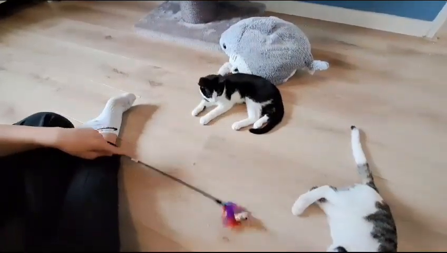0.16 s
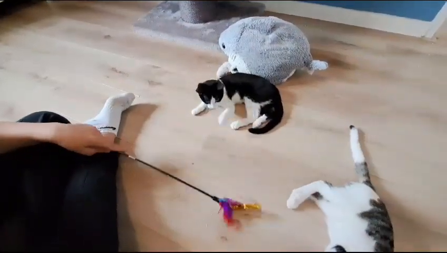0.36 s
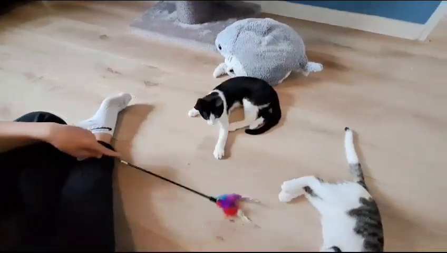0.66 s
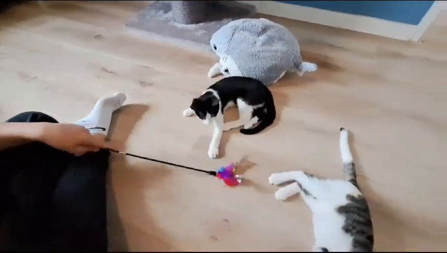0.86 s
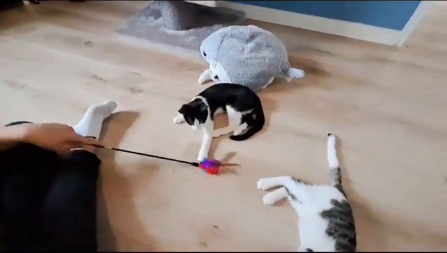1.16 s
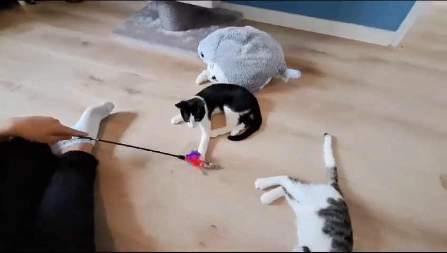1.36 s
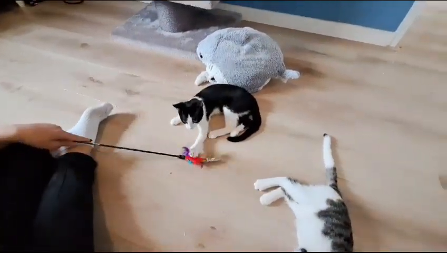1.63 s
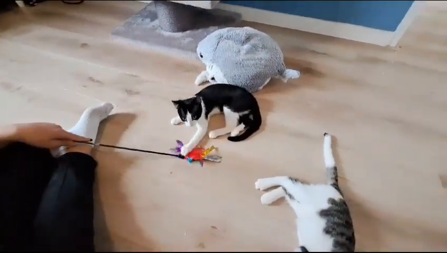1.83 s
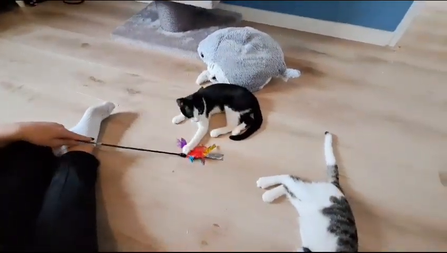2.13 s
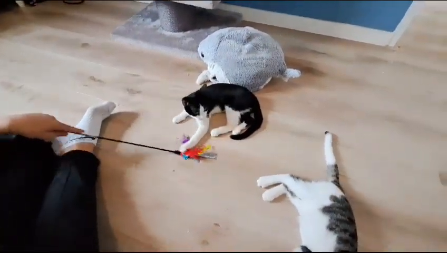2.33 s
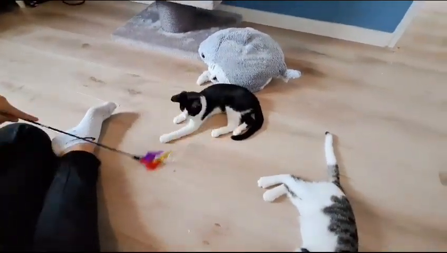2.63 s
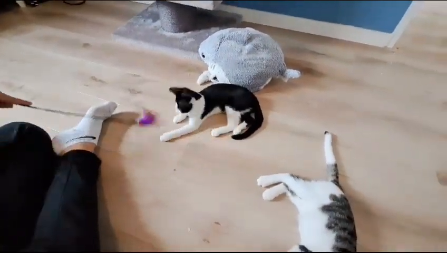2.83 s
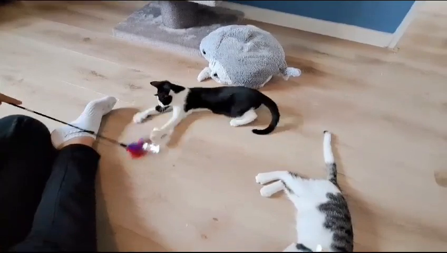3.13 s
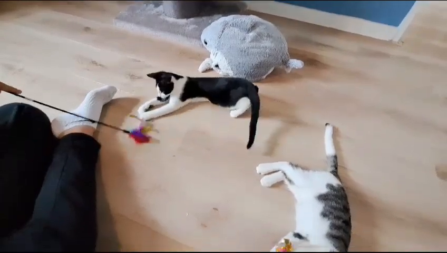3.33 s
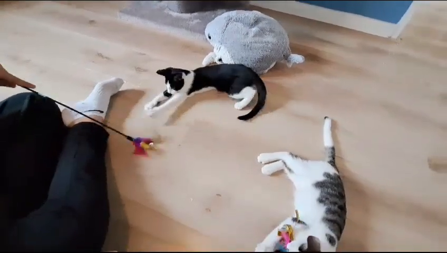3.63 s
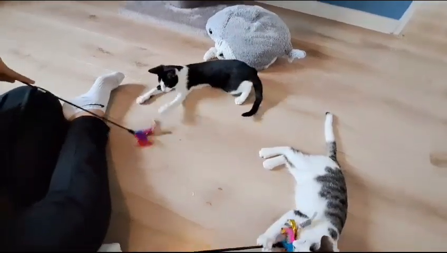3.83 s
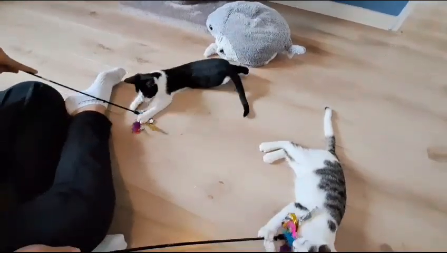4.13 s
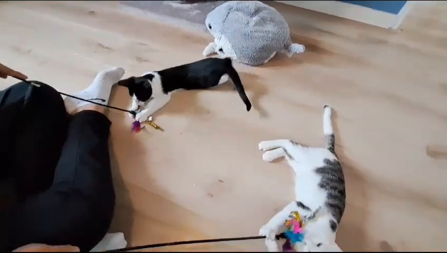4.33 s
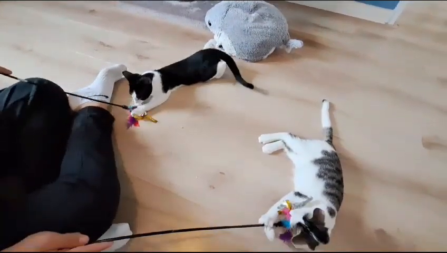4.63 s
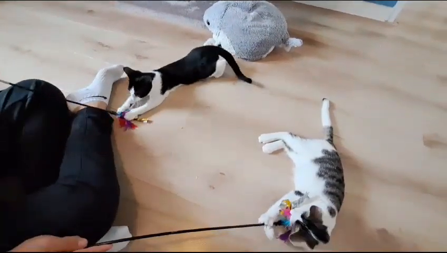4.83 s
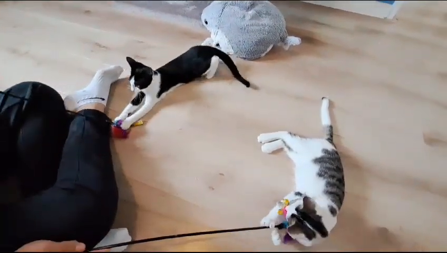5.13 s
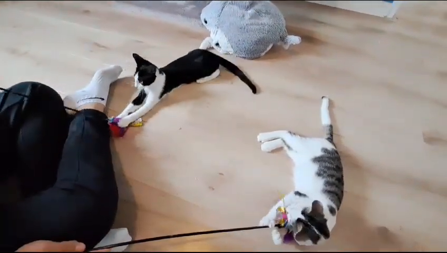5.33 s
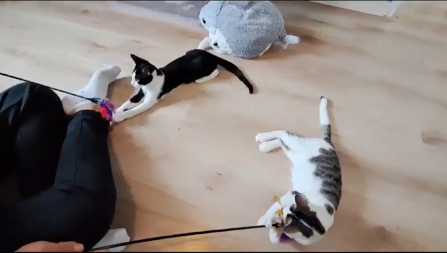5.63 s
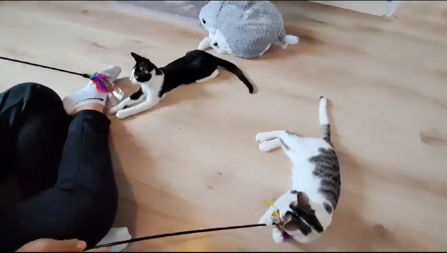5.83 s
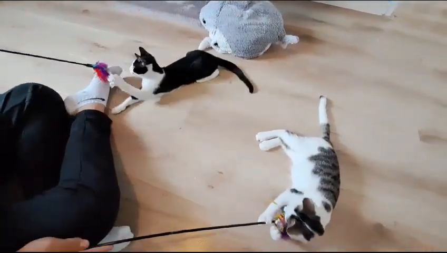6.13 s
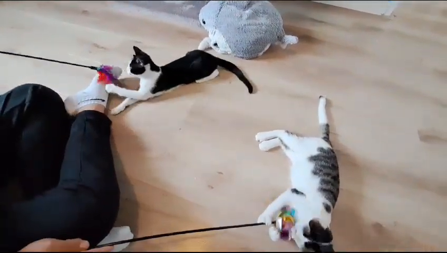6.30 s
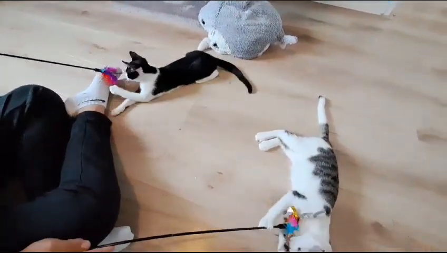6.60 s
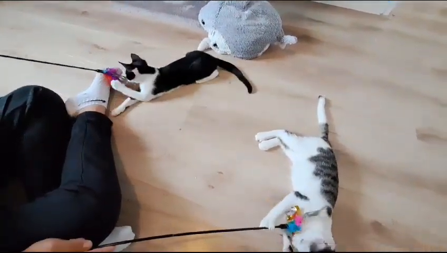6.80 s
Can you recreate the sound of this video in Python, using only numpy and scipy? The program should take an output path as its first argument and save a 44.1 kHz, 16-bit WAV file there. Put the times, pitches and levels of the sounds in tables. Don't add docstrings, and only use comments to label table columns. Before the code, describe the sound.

In a small indoor room, a phone close to a wooden floor picks up a foil and feather wand toy played with by kittens. From 0 to 0.5 s it swishes briskly, with dense bright crinkling, dry feather rub and hollow scrapes on the boards; light paw landings knock near 0.4 and 0.6 s. Crackling continues more loosely to 1.3 s, with another scrape around 1 s. From 1.5 to 2.5 s it is quiet, just faint rustle and isolated claw ticks. Foil snaps return from 2.7 s, busy through 3.9 s, with the sharpest click at about 4 s. Afterwards small crinkles and ticks are scattered, with a modest flurry around 5.6 to 5.9 s including a barely audible claw squeak, another rustle near 6.2 s, then near stillness. Low appliance hum, muffled body shifts and faint hiss run throughout.

```python
import sys
import numpy as np
from scipy import signal
from scipy.fft import rfft, irfft, next_fast_len
from scipy.io import wavfile
from scipy.ndimage import uniform_filter1d, map_coordinates

SR = 44100
rng = np.random.default_rng(int(sys.argv[2]) if len(sys.argv) > 2 else 0)


def log_audio(samples):
    frames = np.atleast_2d(samples).T
    limited = np.clip(frames, -1, 1)
    pcm = np.round(limited * 32767).astype(np.int16)
    wavfile.write(sys.argv[1], SR, pcm)


def undo_db(level):
    steps = np.asarray(level, float) / 20
    return 10 ** steps


N = 306936

# [t/s, hold/s, foil level/dB, drag level/dB]
TUGS = [(0.023, 0.023, -35, -44.5), (0.078, 0.0069, -45, -61), (0.156, .01, -62, -48),
        (0.227, 0.028, -38, -67), (0.267, 0.0058, -54, -45.5), (0.416, 0.046, -41.5, -54.5),
        (0.733, 0.011, -48.5, -57.5), (0.804, .01, -47.5, -52.5), (1.106, 0.08, -49, -55),
        (1.147, 0.015, -66, -51.5), (1.252, 0.011, -54, -60), (1.425, 0.13, -70, -61.5),
        (1.774, 0.034, -60, -62.5), (2.172, 0.1, -69, -74.5), (2.533, 0.0074, -63, -87),
        (2.717, 0.13, -57.5, -75), (2.915, 0.013, -49, -51), (3.095, 0.014, -61, -52.5),
        (3.264, 0.017, -51, -59), (3.444, 0.017, -45, -53.5), (3.69, 0.03, -44, -53),
        (3.76, 0.079, -45, -52.5), (3.89, 0.013, -57.5, -59.5), (3.92, 0.0098, -51, -53.5),
        (3.968, .01, -58, -77), (.12, .02, -58, -65), (5.965, .03, -60.5, -73), (6.03, 0.0091, -65, -74),
        (3.995, 0.016, -41, -48.5), (4.708, 0.037, -57, -58), (4.382, 0.12, -66, -69),
        (5.275, 0.024, -60.5, -63.5), (5.604, 0.039, -57, -69), (5.685, 0.022, -50, -62),
        (5.74, 0.029, -50.5, -53.5), (5.845, 0.0042, -48, -58.5), (6.206, 0.036, -54, -63.5)]
# [t/s, hold/s, foil level/dB, drag level/dB]
PULLS = [(.01, 0.31, -47.5, -56), (0.494, 0.19, -49, -56), (0.853, 0.057, -52, -57),
         (1.026, 0.0074, -55.5, -55), (1.5, 0.29, -63, -71.5), (1.335, 0.094, -61.5, -71),
         (1.86, 0.045, -70, -77), (2.0, 0.054, -75, -83), (2.48, 0.087, -65.5, -72.5),
         (2.68, .05, -67.5, -74), (2.85, 0.15, -51, -59), (3.1, 0.21, -51.5, -59),
         (3.44, .05, -56.5, -58.5), (3.54, 0.09, -50, -61.5), (3.81, 0.025, -62, -58),
         (4.04, 0.017, -55.5, -57), (4.526, 0.014, -63, -65), (4.78, 0.094, -57.5, -64.5),
         (4.983, 0.011, -58, -62), (5.17, 0.087, -66, -70), (5.37, 0.044, -66.5, -69.5),
         (5.906, 0.069, -79, -79), (6.09, .01, -98, -77), (6.283, 0.19, -60.5, -70.5),
         (6.567, 0.092, -73.5, -82.5), (6.9, 0.068, -74, -81.5)]
# [f/Hz, level/dB]
FOIL = [(1500, -120), (3000, -22.5), (4500, -9.5), (6000, -4), (9000, -3), (12000, 3.5), (14000, 1.5),
        (16000, -1)]
# [f/Hz, level/dB]
DRAG = [(500, -120), (1100, -8), (1700, -6.5), (2400, -3), (3200, -4.5), (5000, -7), (9000, -67)]
# [t/s, peak level/dB, body re peak/dB, broad fold re peak/dB]
SNAPS = [(0.0804, -25.5, -23, -9), (.1113, -33, -21, -9), (0.139, -29, -20, -11.5),
         (0.207, -33, -27, -21.5), (.2254, -31.5, -32, -9), (.3765, -31.5, -9, -12),
         (.5345, -29.5, -11, -13), (.716, -28, -33, -21), (.8582, -31, -18, -17), (.9172, -26, -12.5, -22),
         (1.151, -30.5, -22, -28), (2.0075, -47, -22, -21), (2.5376, -34, -11.5, -26),
         (2.688, -42, -12, -8), (2.7122, -28.5, -20, -29), (2.845, -29, -11, -17), (2.971, -29.5, -15, -23),
         (3, -27, -28, -23), (3.052, -26.5, -16, -16), (3.2305, -23, -13, -38), (3.259, -24, -26.5, -24),
         (3.4648, -20, -22, -22), (3.65, -27.5, -13, -21), (3.6835, -20.5, -20, -42),
         (4.4703, -39, -30, -12), (4.7465, -33, -26, -31), (4.918, -29, -19, -21), (5.837, -31, -30, -19),
         (6.121, -43.5, -30, -13), (6.193, -31, -16, -19)]
# [t/s, peak level/dB, body re peak/dB, broad fold re peak/dB]
CLAWS = [(0.413, -31.5, -20, -3.5), (0.6427, -37.5, -2, -3), (0.8062, -32.5, -2, -12),
         (1.256, -34, -7.5, -10), (1.3971, -37, -6, -12), (1.4435, -26, -11.5, -29),
         (1.5027, -38.5, -3, -30), (1.758, -39, -6, -12), (1.7817, -30, -7, -35), (2.5148, -38, -16, -20),
         (2.611, -40.5, -4, -23), (2.666, -40.5, -5, -14), (2.7837, -25, -17, -25), (2.9019, -31.5, -1, -3),
         (3.0915, -23, -15, -13.5), (3.4346, -30, -1, -20), (3.808, -27.5, -7, -14), (3.918, -29, -14, -26),
         (3.9884, -14, -13.5, -34), (4.361, -43, -27, -20), (4.7002, -38.5, 6, -5.5),
         (4.997, -36.5, -5, -17), (5.128, -43, -14, -8), (5.261, -33, -12, -13.5), (5.3626, -53, -21, 0),
         (5.5924, -38.5, -22, -28), (5.693, -30, -14, -25), (5.7146, -33, -4, -31),
         (5.7514, -26.5, -3.5, -16), (6.2254, -33.5, -8, -17)]
# [t/s, peak level/dB]
TICKS = [(0.1206, -35), (0.63, -31), (0.687, -40), (0.947, -33), (1.0829, -33), (1.3668, -54),
         (1.6447, -45), (1.9041, -46), (2.2388, -45.5), (2.3431, -57), (2.4508, -56), (2.4703, -51.5),
         (3.1435, -30), (3.34, -34), (3.6154, -33.5), (3.9647, -34), (4.115, -40), (4.3215, -56.5),
         (4.6202, -46), (4.6349, -41), (5.1813, -46), (5.197, -38), (5.236, -42), (5.3858, -40.5),
         (5.5418, -53), (5.9626, -44), (6.0891, -69), (6.1484, -45), (6.335, -41), (6.4513, -43)]
# [t/s, peak level/dB, centre f/Hz]
FLICKS = [(0.1214, -25.5, 14500), (0.1494, -27, 14500), (0.1604, -29, 6720), (0.2551, -25, 7280),
          (0.2907, -33, 12100), (0.341, -33, 14400), (0.4033, -40, 12800), (0.433, -31, 12800),
          (0.4543, -27, 12800), (0.481, -33, 12300), (0.5744, -32, 12300), (0.7905, -37, 7370),
          (0.9767, -42, 9720), (1.128, -34, 7780), (1.205, -45, 10800), (1.2241, -45, 11800),
          (1.5419, -38, 14300), (1.6771, -50, 12300), (1.707, -47, 7680), (1.736, -38, 12300),
          (1.883, -49, 12200), (2.1695, -47.5, 12700), (2.878, -42, 12900), (3.0126, -34, 10100),
          (3.1074, -31, 12100), (3.1806, -34.5, 10600), (3.3897, -52, 6290), (3.4024, -53, 7850),
          (3.4225, -39, 10200), (3.4326, -37, 13400), (3.6593, -34, 13000), (3.673, -32, 13200),
          (3.7094, -28, 12300), (3.8926, -38, 7450), (4, -23, 10500), (4.0104, -27, 12100),
          (4.1087, -40, 5100), (4.151, -49.5, 7560), (4.449, -48, 10700), (4.5416, -55, 7430),
          (4.5945, -53, 7190), (4.6643, -43, 12200), (4.879, -40.5, 12400), (4.9721, -41, 7180),
          (5.012, -46, 7760), (5.0848, -53, 12600), (5.2145, -41, 10600), (5.314, -50, 6260),
          (5.4964, -57, 8650), (5.6381, -37, 11700), (5.671, -40, 12100), (5.8514, -39, 12000),
          (5.9115, -41, 11900), (5.9874, -48, 11300), (6.03, -46, 12200), (6.199, -35, 12300),
          (6.2931, -54, 11700), (6.5899, -48, 12800), (6.6598, -57, 12900), (6.8748, -54, 12300)]
# [t/s, left re right level/dB]
SIDEWAYS = [(0, -1.5), (.7, -1), (1.5, -2), (2.5, -1), (3.5, 1), (4.5, -1), (5.5, 0), (6.9, 0)]
# [t/s, hold/s, low scrape level/dB, upper scrape level/dB]
SWEEPS = [(.02, 0.031, -48, -48), (.064, 0.021, -42, -43.5), (.17, 0.0034, -38, -44.5),
          (.25, 0.031, -40.5, -42), (.46, 0.016, -40.5, -47.5), (.63, 0.0033, -58, -57),
          (.806, 0.027, -60.5, -54), (.995, 0.037, -45, -51), (1.16, 0.02, -59, -54.5),
          (1.41, 0.045, -74, -72), (2, 0.26, -81, -81.5), (2.79, 0.075, -77, -63.5),
          (2.92, 0.25, -67, -62.5), (3.45, 0.039, -66.5, -63), (3.7, 0.2, -70, -63),
          (3.994, 0.012, -62, -80), (4.15, 0.082, -86, -86), (4.72, 0.44, -82, -95), (5.26, .1, -88, -102),
          (5.71, 0.065, -75, -66)]
# [t/s, hold/s, low scrape level/dB, upper scrape level/dB]
PAWS = [
    (.41, 0.0059, -46, -53),
    (.593, 0.0046, -52.5, -62),
    (1.76, 0.039, -93, -67),
    (2.41, 0.1, -77, -76),
    (3.205, 0.073, -61.5, -65),
    (6.175, 0.07, -67, -71.5),
]
# [t/s, share of the highest low mode/0-1]
TIP_PLACE = [(.06, 0.61), (.17, 0.85), (.26, 0.84), (.41, 0.8), (.47, 0.43), (.6, 0.8), (1.01, 0.68),
             (3.2, 0.7), (6.2, 0.57)]
# [f/Hz, width/Hz, level/dB]
LOW_BOARDS = [(552, 340, -4), (785, 324, -3.5), (950, 310, -3)]
# [f/Hz, width/Hz, level/dB]
UPPER_BOARDS = [(1142, 300, 2.5), (1703, 340, 9), (2270, 210, 6)]
# [f/Hz, T60/s]
WALL_T60 = [(300, 0.41), (2000, 0.33), (12000, 0.32)]
# [f/Hz, level/dB]
VENT_TILT = [(300, 1), (700, -5.5), (1300, -8), (2500, -6.5), (4500, -5), (6300, -8), (7800, 1.5),
             (11000, 0), (16000, 0)]
# [f/Hz, width/Hz, level/dB]
DUCT = [(2370, 600, 2), (7500, 730, 1.5), (9940, 480, -5), (12460, 370, 1)]
# [t/s, hold/s, boom level/dB, swish level/dB]
SHIFTS = [(.01, 0.75, -54.5, -56.5), (.6, 0.072, -65, -56), (.75, 0.022, -54, -86),
          (.94, 0.089, -52.5, -58), (1.1, 0.47, -56.5, -65), (1.44, 0.0044, -48, -64.5),
          (1.78, 0.089, -63, -62), (2.15, 0.1, -61.5, -63), (2.95, 0.15, -69, -60),
          (3.16, 0.039, -53.5, -65), (3.33, 0.031, -52, -62.5), (3.45, 0.06, -52, -63),
          (3.74, 0.18, -51, -63.5), (4.55, .05, -64, -66.5), (5.82, 0.043, -54.5, -64),
          (6.22, 0.12, -58, -65.5), (6.5, 0.014, -55, -67.5), (.92, 0.025, -70, -58.5),
          (3.22, 0.035, -70, -61.5), (6.8, .04, -57, -78.5)]
# [f/Hz, width/Hz, level/dB]
HUM_MODES = [(43, 5.4, -17.5), (57.3, 4.5, 0.5), (70.4, 7.4, 2.5), (99.7, 6, -2.5), (121.4, 12.4, -3.5),
             (136.8, 6.06, 5), (201.6, 14.3, -11)]
# [f/Hz, level/dB]
SWISH = [(120, -24), (200, -3.5), (221, -17), (292, -8), (387, -14.5), (800, -29.5), (1040, -135),
         (1760, -120)]
# [f/Hz, level/dB]
HISS = [(18, -40), (30, -57), (53, 23), (134, 15.5), (328, 6), (384, -59), (684, -33), (2290, -65.5),
        (6210, -76), (12600, -45), (16000, -32)]


def toy():
    tugs = curves(TUGS, rise_s=0.054, sag_db_per_s=31, fall_s=0.076)
    pulls = curves(PULLS, rise_s=0.21, sag_db_per_s=4.5, fall_s=0.14)
    crease_db, drag_db = together(tugs, pulls)
    fold_db = -4 + 0.56 * (drag_db - crease_db)
    creases = crackle(rate_hz=430, spread_db=6.0, clump_db=1.8, smooth_db=1, alike=0.15)
    flutter = crackle(rate_hz=350, spread_db=13.0, clump_db=2.5, smooth_db=6.5, alike=0.053)
    small = unit(filtered(creases, lambda hz: high(hz) * shape(FOIL)(hz)))
    broad = unit(filtered(0.85 * creases + 0.87 * flutter, lambda hz: (1 - high(hz)) * shape(FOIL)(hz)))
    foil = undo_db(crease_db - 1.5) * patchy(small + undo_db(fold_db + 3) * broad, depth_db=2.2)
    slips = crackle(rate_hz=1800, spread_db=0.0, clump_db=2.0, smooth_db=-3.0, alike=0.5)
    rub = filtered(slips + 0.33 * flutter, shape(DRAG))
    return foil + undo_db(drag_db + 0.5) * unit(patchy(rub, depth_db=1.6))


def high(hz):
    return 1 / (1 + (6800 / (hz + 1)) ** 6)


def patchy(x, depth_db):
    z = signal.stft(x, nperseg=256)[2]
    field = rng.standard_normal(z.shape[1:])
    field = uniform_filter1d(field, size=9, axis=0)
    field = uniform_filter1d(field, size=24, axis=1)
    return signal.istft(z * undo_db(depth_db * unit(field)), nperseg=256)[1][:, :N]


def snaps():
    length = 2000
    snap_t60_s, crumple_t60_s, crumple_db = 0.0034, 0.069, -24.5
    knock_t60_s, knock_db = 0.021, -8.0
    tick_db, tick_body_db, tick_fold_db = -3.5, -12, -8.5
    crease, fold, dull = np.zeros((3, 2, N + length))
    t = np.arange(length) / SR
    rise = 1 - np.exp(-(t / 0.0009) ** 2)
    fall = undo_db(-60 * t / snap_t60_s) + undo_db(crumple_db - 60 * t / crumple_t60_s)
    dull_fall = fall + undo_db(knock_db - 60 * t / knock_t60_s)
    ticks = [(s, db + tick_db, tick_body_db, tick_fold_db) for s, db in TICKS]
    rows = SNAPS + CLAWS + ticks
    chance = rng.standard_normal((len(rows), 3, length))
    for (s, db, body_db, fold_db), (common, own, knock) in zip(rows, chance):
        sides = undo_db(np.array([[.7], [-.7]]) * knock[0])
        crack = (common + 0.96 * own * [[1], [-1]]) * rise * fall
        crack = undo_db(db + 0.5) * sides * crack / np.abs(crack).max()
        at = round(s * SR)
        crease[:, at:at + length] += crack
        fold[:, at:at + length] += undo_db(fold_db + 23.0) * crack
        dull[:, at:at + length] += undo_db(db + body_db + 12.0) * sides * rise * knock * dull_fall
    foil = filtered(crease[:, :N], high) + filtered(fold[:, :N], lambda hz: 1 - high(hz))
    return filtered(foil, shape(FOIL)) + filtered(dull[:, :N], shape(DRAG))


def flicks():
    length, width_octaves = 2000, 0.32
    flick_t60_s, settle_t60_s, settle_db = 0.0035, 0.034, -23
    out = np.zeros((2, N + length))
    t = np.arange(length) / SR
    hz = np.fft.rfftfreq(length, 1 / SR) + 1
    rise = 1 - np.exp(-(t / .0008) ** 2)
    swell = rise * (undo_db(-60 * t / flick_t60_s) + undo_db(settle_db - 60 * t / settle_t60_s))
    chance = rng.standard_normal((len(FLICKS), 2, length))
    for (s, db, centre_hz), (common, own) in zip(FLICKS, chance):
        band = 0.35 + np.exp(-.5 * (np.log2(hz / centre_hz) / width_octaves) ** 2)
        noise = common + 1.7 * own * [[1], [-1]]
        burst = swell * irfft(rfft(noise) * band * hz / (hz + 4000))
        at = round(s * SR)
        out[:, at:at + length] += undo_db(db + 1) * burst / np.abs(burst).max()
    return out[:, :N]


def squeak():
    start_s, length_s, hz, level_db = 5.598, .028, 2830, -63
    t = np.arange(N) / SR - start_s
    swell = np.sin(np.pi * np.clip(t / length_s, 0, 1))
    return undo_db(level_db + 3 * wobble(300)) * swell * np.sin(2 * np.pi * hz * t)


def scrape():
    sweeps = curves(SWEEPS, rise_s=0.048, sag_db_per_s=43, fall_s=0.048, rest_db=(-90, -97))
    paws = curves(PAWS, rise_s=0.0092, sag_db_per_s=36, fall_s=0.044)
    low_db, upper_db = together(sweeps, paws)
    grit = crackle(rate_hz=1100, spread_db=3, clump_db=1.2, smooth_db=1.5, alike=0.86)

    def soft(hz):
        return 1 / (1 + 1j * hz / 1500) ** 2 * hz / (hz + 400)

    near = unit(filtered(grit, lambda hz: soft(hz) * modes(LOW_BOARDS[:2])(hz) ** 2))
    far = unit(filtered(grit, lambda hz: soft(hz) * modes(LOW_BOARDS[2:])(hz) ** 2))
    share = np.clip(np.interp(np.arange(N) / SR, *np.transpose(TIP_PLACE)), 0, 1)
    low = np.sqrt(1 - share) * near + np.sqrt(share) * far
    upper = unit(filtered(grit, lambda hz: soft(hz) * modes(UPPER_BOARDS)(hz)))
    return undo_db(low_db) * low + undo_db(upper_db) * upper


def walls(x):
    hz, t, z = signal.stft(rng.standard_normal((2, SR // 2)), SR, nperseg=256)
    shared = 1 / (1 + (hz[:, None] / 800) ** 4)
    z = np.array([z[0], shared * z[0] + np.sqrt(1 - shared ** 2) * z[1]])
    decay = undo_db(-60 * t / along(WALL_T60, hz)[:, None])
    tail = signal.istft(z * decay, SR, nperseg=256)[1]
    tail = tail / np.linalg.norm(tail[0])
    late = np.pad(x, (150, 0))[None]
    return signal.fftconvolve(late, tail, axes=1)[:, :N]


def ports(x, lead_samples):
    def dip(hz):
        return 1 - 0.36 * modes([(3500, 450, 0)])(hz)

    def vent(hz):
        return dip(hz) * undo_db(along(VENT_TILT, hz)) * np.exp(2j * np.pi * hz * lead_samples / SR)

    def duct(hz):
        return dip(hz) * (1 + sum(modes([row])(hz) for row in DUCT))

    return filtered(x, lambda hz: np.array([vent(hz), duct(hz)]))


def room_tone():
    hum_db, swish_db = curves(SHIFTS, rise_s=0.15, sag_db_per_s=18.7, fall_s=0.082, rest_db=(-60.5, -73))
    rumble = pair(alike=.96, response=lambda hz: modes(HUM_MODES)(hz) * hz ** 2 / (hz ** 2 + 32 ** 2))
    swell = np.abs(uniform_filter1d(rumble[1] ** 2, size=5000))
    hum = undo_db(hum_db + 4.0) * unit(rumble / np.sqrt(4.0 + swell))
    motor_hz, motor_width_hz, motor_db = 190, 2.52, -63
    phase = 2 * np.pi * np.cumsum(motor_hz + motor_width_hz * 0.312 * wobble(3.05)) / SR
    motor = undo_db(motor_db + 3 + 0.3 * wobble(5.1)) * np.sin(phase)
    swish = undo_db(swish_db + 2.0 + 1.7 * wobble(25)) * pair(alike=.76, response=shape(SWISH))
    hiss = undo_db(-62.5) * pair(alike=0.96, response=shape(HISS))
    return (hum + motor + swish + hiss) * undo_db([[-1.2], [1.2]])


def crackle(rate_hz, spread_db, clump_db, smooth_db, alike):
    size_db = np.minimum(spread_db * rng.exponential(size=N), 9)
    slips = (rng.random(N) < rate_hz / SR) * undo_db(size_db)
    t = np.arange(200) / SR
    puffs = np.convolve(slips, t * np.exp(-t / 0.0004))[:N]
    bed = unit(puffs) + undo_db(smooth_db)
    return unit(bed * undo_db(clump_db * wobble(30)) * pair(alike))


def pair(alike, response=None):
    noise = rng.standard_normal((2, N))
    a, b = filtered(noise, response) if response else noise
    turn = np.arccos(np.clip(alike, -1, 1)) / 2
    mid, side = np.cos(turn) * a, np.sin(turn) * b
    return unit(np.array([mid + side, mid - side]))


def curves(rows, rise_s, sag_db_per_s, fall_s, rest_db=(-100, -100)):
    t = np.arange(0, N + 64, 64) / SR
    s, hold, *levels = np.transpose(rows)[:, :, None]
    held = np.clip(t - s, 0, np.abs(hold))
    before, after = np.maximum(s - t, 0), np.maximum(t - s - held, 0)
    loss_db = 20 * before / rise_s + sag_db_per_s * held + 20 * after / fall_s
    out = []
    for db, rest in zip(levels, rest_db):
        power = np.sum(undo_db(db - loss_db) ** 2, axis=0) + undo_db(rest) ** 2
        out.append(np.interp(np.arange(N) / SR, t, 10 * np.log10(power)))
    return out


def together(*layers):
    return [10 * np.log10(sum(undo_db(db) ** 2 for db in column)) for column in zip(*layers)]


def wobble(rate_hz):
    knots = rng.standard_normal(int(N * rate_hz / SR) + 4)
    return map_coordinates(knots, [np.arange(N) * rate_hz / SR])


def filtered(x, response):
    m = next_fast_len(N + SR // 2)
    return irfft(rfft(x, m) * response(np.fft.rfftfreq(m, 1 / SR)), m)[..., :N]


def modes(table):
    def response(f):
        total = 0
        for k, (centre, width, db) in enumerate(table):
            peak = 1j * f * width / (centre * centre - f * f + 1j * f * width)
            total = total + (-1) ** k * undo_db(db) * peak
        return total
    return response


def shape(points):
    return lambda hz: undo_db(along(points, hz))


def along(points, hz):
    f, v = np.transpose(points)
    return np.interp(np.log(hz + 1), np.log(f + 1), v)


def unit(x):
    return x / np.sqrt(np.mean(x ** 2) + 1e-20)


def scene():
    rustle = toy()
    ticks = snaps() + flicks() + squeak()
    boards = scrape()
    wet = undo_db(-10.5) * walls((rustle + 0.14 * ticks + 1.32 * boards).mean(axis=0))
    side_db = np.interp(np.arange(N) / SR, *np.transpose(SIDEWAYS)) * [[.5], [-.5]]
    toy_sound = undo_db(side_db) * (rustle + ticks) + wet
    return ports(toy_sound, lead_samples=9.43) + ports(boards, lead_samples=0.64) + room_tone()


def top_cut(x):
    return signal.sosfilt(signal.butter(12, 17010, fs=SR, output="sos"), x)


def record(dry):
    top_hz, top_width_hz, top_db = 15750, 950, -9.0
    top = filtered(dry, lambda hz: (hz >= top_hz) & (hz < top_hz + top_width_hz))
    power = np.mean(top ** 2, axis=0)
    sharp = uniform_filter1d(power, 64) > 11 * np.abs(uniform_filter1d(power, 2000))
    gate = uniform_filter1d(uniform_filter1d(sharp * 1., 200), 200) * 3
    mix = filtered(dry, lambda hz: hz < top_hz) + undo_db(top_db) * np.clip(gate, 0, 1) * top
    return top_cut(mix)


dry = scene()
out = record(dry)
log_audio(out)
```